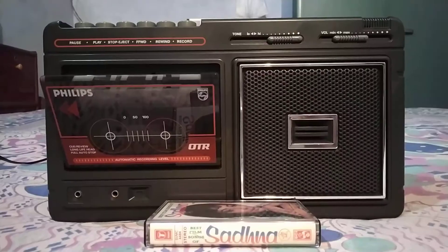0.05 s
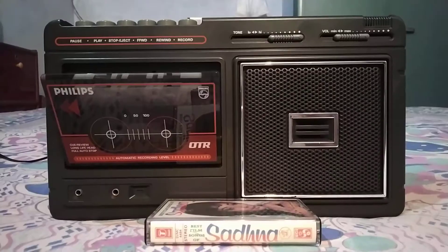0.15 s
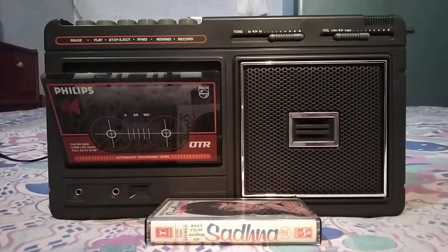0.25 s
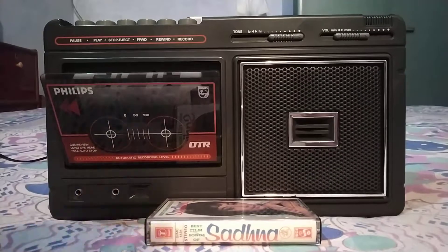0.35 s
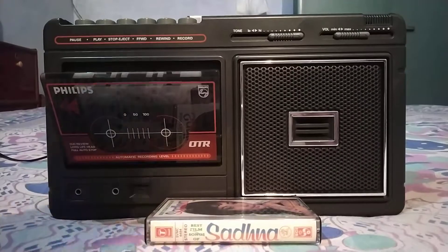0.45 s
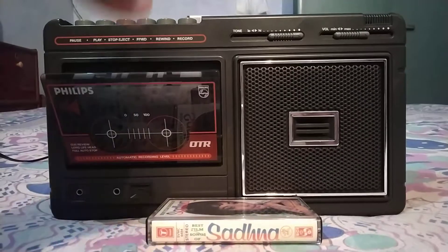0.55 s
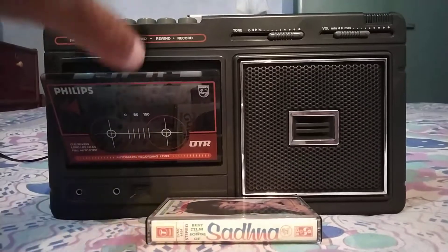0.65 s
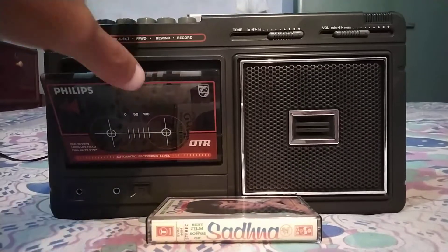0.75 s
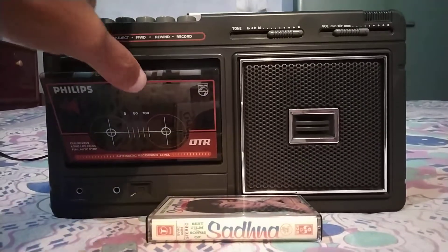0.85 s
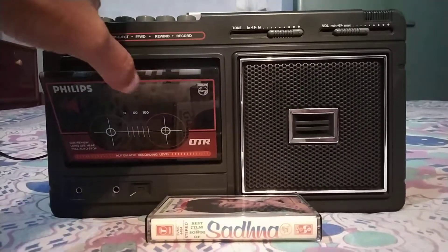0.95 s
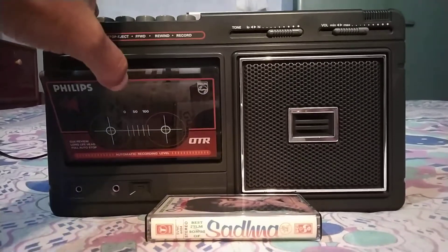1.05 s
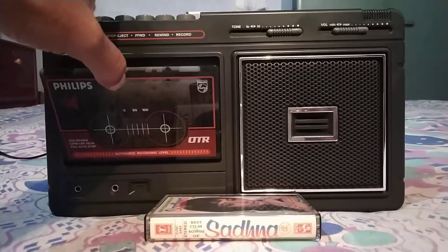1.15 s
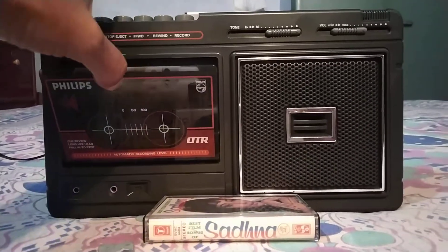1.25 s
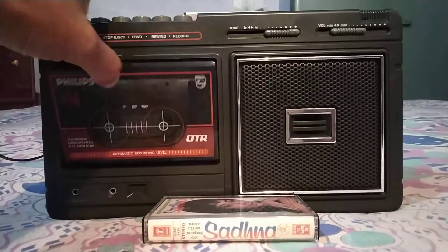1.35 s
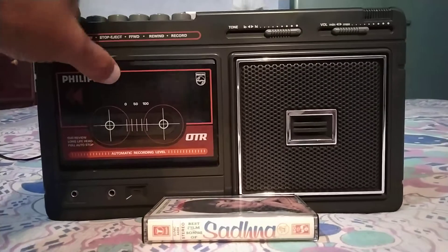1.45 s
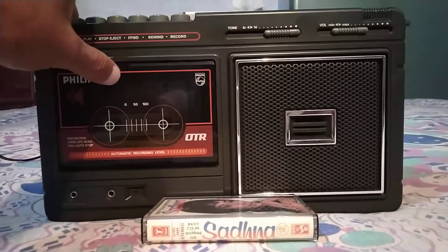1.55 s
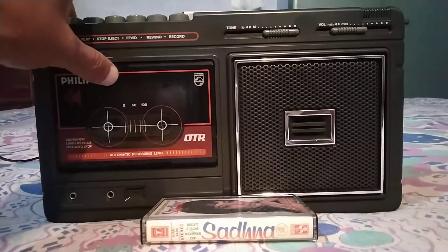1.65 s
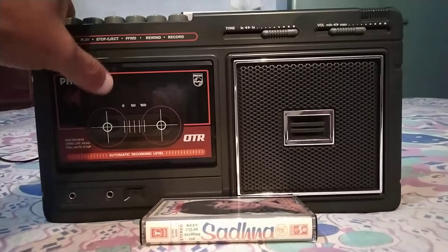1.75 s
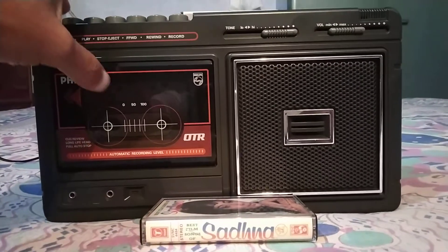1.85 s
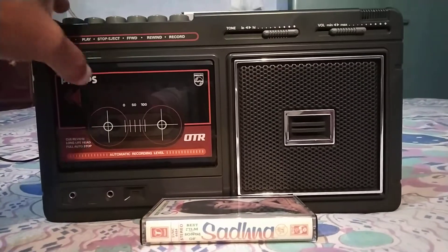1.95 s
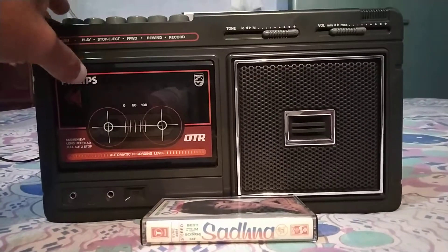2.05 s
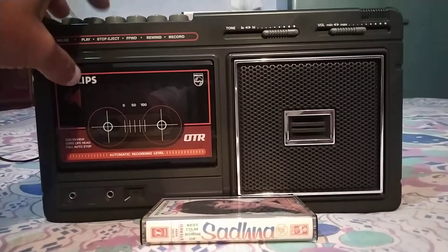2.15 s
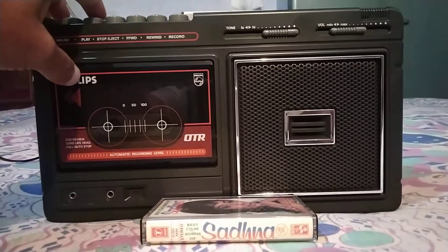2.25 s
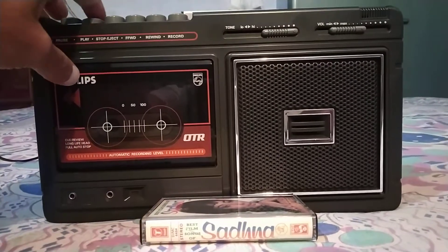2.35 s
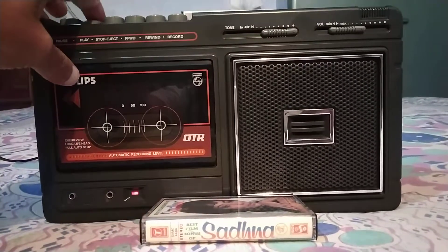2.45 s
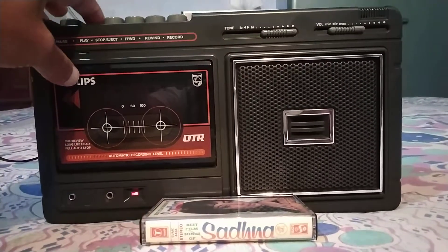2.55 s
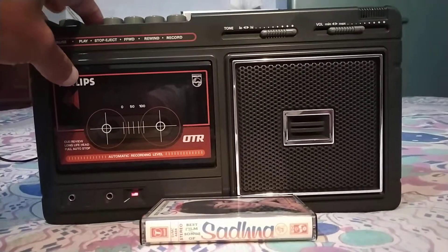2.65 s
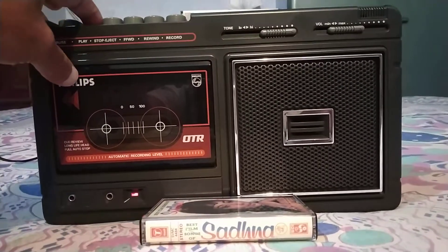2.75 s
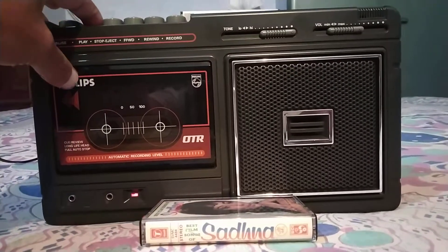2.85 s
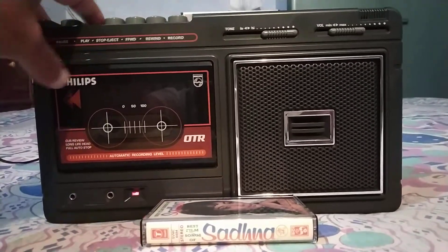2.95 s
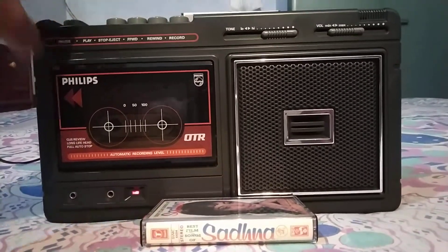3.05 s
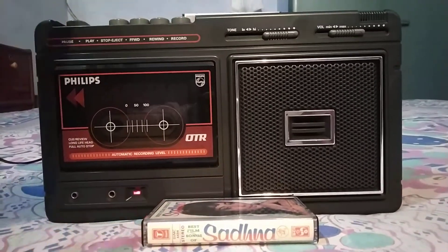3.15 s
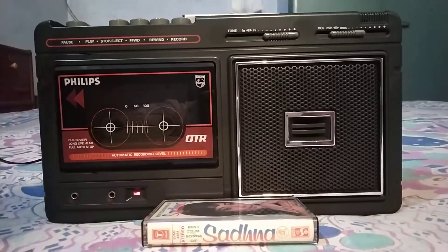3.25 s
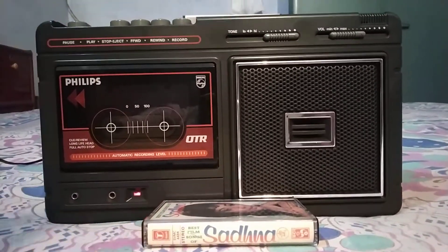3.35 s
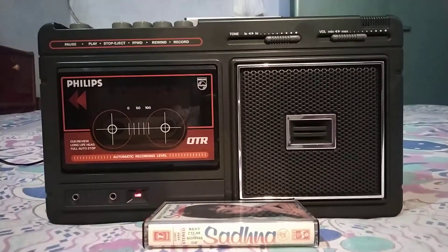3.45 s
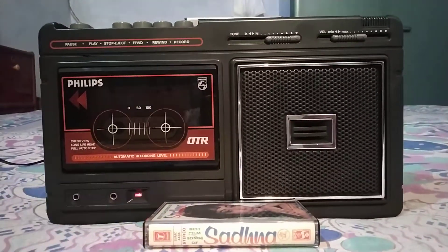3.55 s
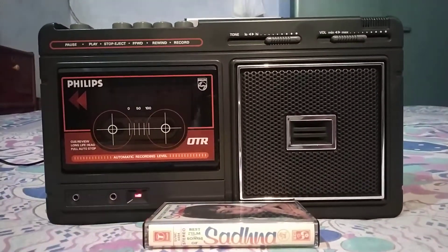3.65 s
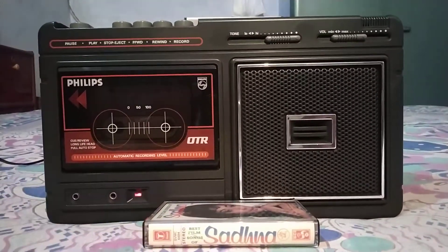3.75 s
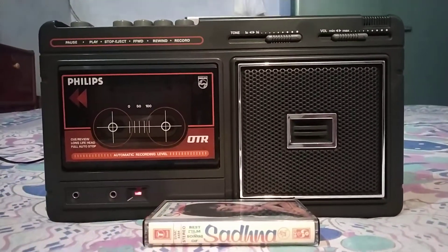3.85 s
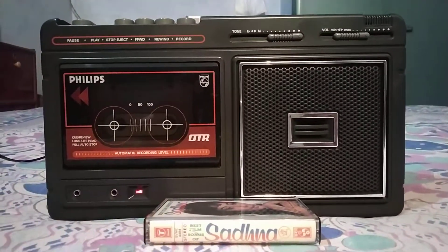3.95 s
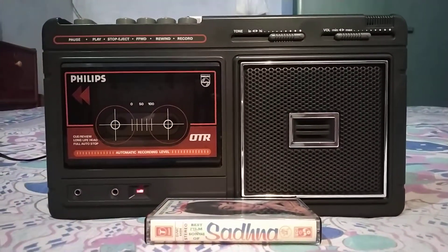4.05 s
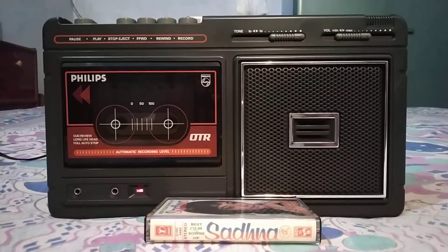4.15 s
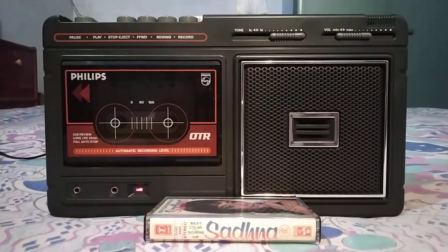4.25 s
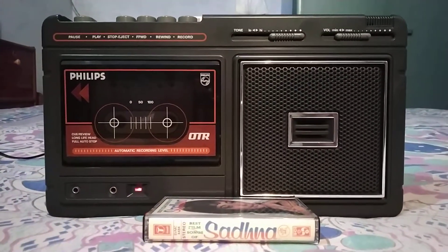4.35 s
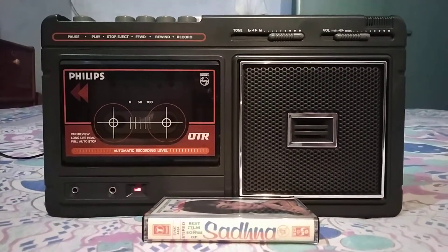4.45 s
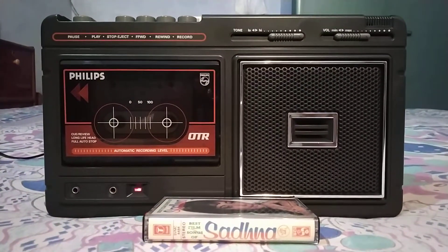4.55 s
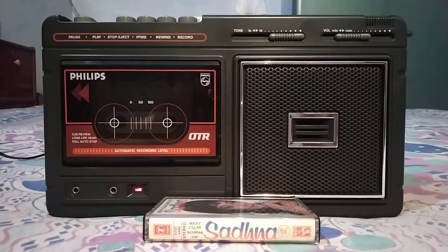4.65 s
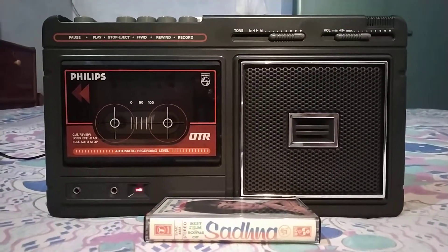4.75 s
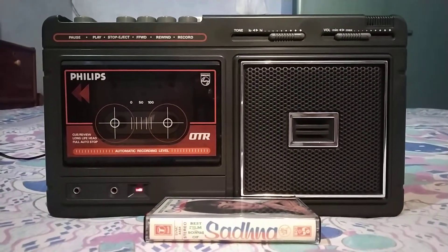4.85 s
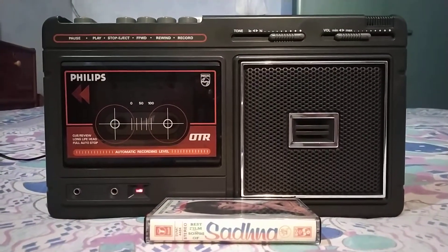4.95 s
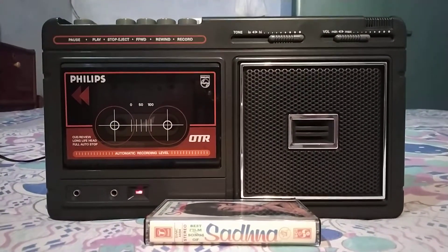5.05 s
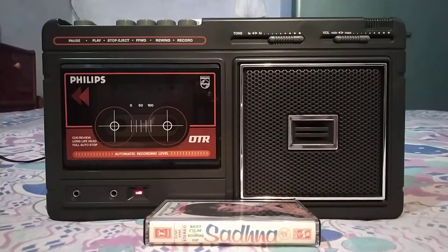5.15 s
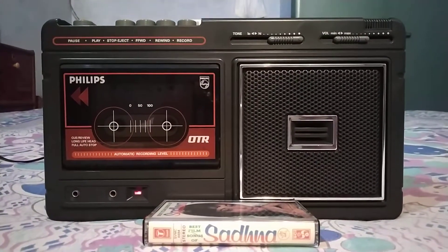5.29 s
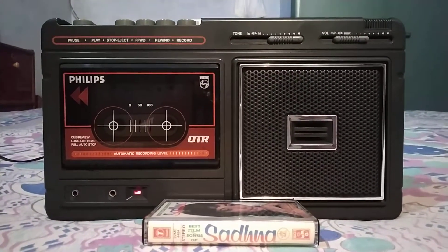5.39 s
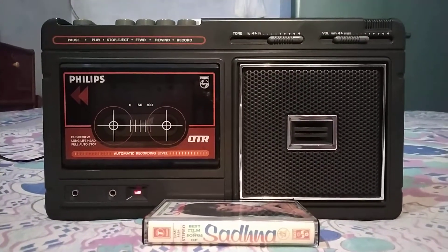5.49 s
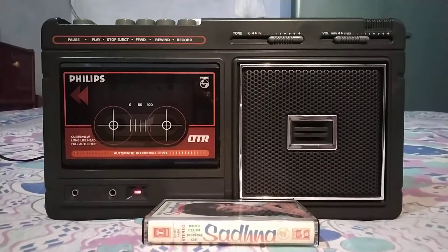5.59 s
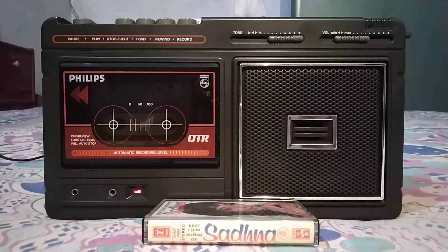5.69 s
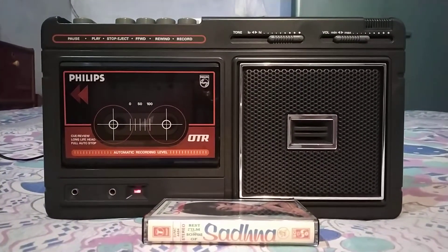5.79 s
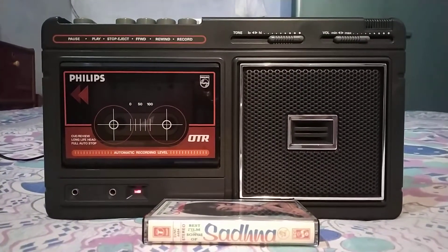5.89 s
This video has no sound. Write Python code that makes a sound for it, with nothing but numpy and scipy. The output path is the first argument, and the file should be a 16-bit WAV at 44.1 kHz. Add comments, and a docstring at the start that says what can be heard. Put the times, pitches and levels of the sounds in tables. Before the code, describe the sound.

Close stereo microphone in a small quiet room with a low fan hum and a very faint clock tick each second. Fingers lightly scrape plastic, a cassette door snaps shut, then a key thumps hollowly and latches with a bright loud snap. A faint motor whirr and hiss remain, with brief fabric rustle and tiny ticks on the right.

```python
"""A fan hums in a quiet room and a clock ticks far off; on a bed, a portable cassette player is handled.
Its door is pushed shut and a key pressed until it latches: noise bursts and decaying modes make the snaps,
low-passed impulses the thumps of the hollow case. Then a pulse train through resonances makes the motor's
whirr and coloured noise the loudspeaker's faint hiss; gated noise and small ticks are a sleeve brushing
the bedsheet, and brief wandering sines are the spool's squeaks."""
import sys
import numpy as np
from scipy import signal
from scipy.fft import rfft, irfft
from scipy.io import wavfile
from scipy.ndimage import uniform_filter1d

SR = 44100
rng = np.random.default_rng(int(sys.argv[2]) if len(sys.argv) > 2 else 0)


def to_wav(sig):
    """Store sig (one row per channel, or 1-D mono) as 16-bit WAV at the path in sys.argv[1].

    Samples outside -1..1 are clipped; the rate is SR.
    """
    pcm = np.clip(np.atleast_2d(sig), -1, 1) * 32767
    pcm = np.round(pcm).astype(np.int16)
    wavfile.write(sys.argv[1], SR, pcm.T)  # frames by channels


N = 261111
T = np.arange(N) / SR  # time of every sample [s]

# the door's catch, then the key's: (time [s], level [dB], tilt [dB/octave], catch resonance [Hz],
# travel to its stop [s], level at the stop [dB], tilt at the stop [dB/octave],
# knock on the case [dB], shaking of the case [dB], left minus right [dB])
LATCH_ROWS = [(1.4364, -15, -1.5, 2500, 0.0067, -17, 1.3, -24.5, -27, 0),
              (2.6718, -6.5, 1.6, 12200, .0032, -13.5, 0.7, -24, -27, -1.5)]


def door_latch():
    """Impact and modal decay: the door's catch snaps home, and its plastic rings dryly and chatters."""
    # what the catch radiates: (frequency [Hz], gain [dB])
    radiated = [(30, -10), (110, -11), (220, 1), (480, 7.5), (880, -6), (1130, 5.5), (1700, 2.5),
                (2100, -4.5), (2500, 2), (3200, -3.5), (4000, -1), (6000, -5), (7400, 3.5), (8500, -5),
                (10000, -5.5), (16000, -16)]
    # the plastic door's dry ring: (frequency [Hz], level [dB], t60 [s], left minus right [dB])
    modes = [(1157, -30.5, 0.057, -2), (1360, -26, 0.028, 3), (1540, -39, 0.046, -3), (1750, -26, 0.032, 0),
             (1960, -39, 0.054, -5), (2410, -26, 0.028, -8), (2860, -34, 0.057, 12), (3570, -31, 0.033, -4),
             (5180, -29, 0.028, -6), (6550, -27.5, 0.023, -6), (7340, -34, .015, 6), (10000, -33, .025, -1)]
    row = LATCH_ROWS[0]
    sound, blows = latch(row, radiated, modes, ring_delay=0.0006)
    chattering = rattle(row[0], modes, level_db=-29.5, per_s=400, t60=0.073, ring_share=0.25)
    return sound + chattering, blows


def key_latch():
    """Impact and modal decay: the key's catch snaps, its shell rings, and jolted springs chatter on."""
    # what the catch radiates: (frequency [Hz], gain [dB])
    radiated = [(30, -33), (110, -10), (220, 2), (480, 7.5), (680, 3), (1250, 1), (1700, 2), (2600, -1),
                (3800, 0), (4900, 2), (6200, -6.5), (8000, -0.5), (11000, -6.5), (16000, -10)]
    # ring of shell, levers and springs: (frequency [Hz], level [dB], t60 [s], left minus right [dB])
    modes = [(219, -39, 0.23, 6), (432, -22, 0.085, 0.5), (503, -23.5, 0.05, 5), (788, -30, 0.1, 2),
             (973, -28.5, 0.041, 9), (1228, -19, 0.044, 6.5), (1780, -20, 0.04, 4), (2420, -25, 0.085, -5),
             (3450, -36, 0.12, 6), (4330, -24, 0.019, -7), (5130, -26, 0.038, -6), (9300, -39, .07, 1),
             (11200, -44, 0.061, 0), (12300, -38, .05, 4)]
    # small springs and levers of the tape drive, jolted by the key:
    # (frequency [Hz], relative level [dB], t60 of the free ring [s], left minus right [dB])
    springs = [(1580, -4, 0.071, 2), (2520, 1, 0.083, -5), (2855, -1, .1, -9), (3030, -5, 0.15, 0),
               (3300, -2, 0.11, -2), (4680, -9, 0.087, 5), (5070, -4, 0.14, -1), (5880, 0, 0.15, -3),
               (6540, -7, .14, 0), (8420, -2, 0.14, 7), (9260, -5, 0.073, 0), (9900, -3, 0.11, 2),
               (11070, -2, .16, 6), (12800, 2, 0.071, -3)]
    row = LATCH_ROWS[1]
    sound, blows = latch(row, radiated, modes, ring_delay=0.0022)
    chattering = rattle(row[0], springs, level_db=-55.5, per_s=790, t60=0.25, ring_share=0.45, delay=0.002)
    return sound + chattering, blows


def latch(row, radiated, modes, ring_delay, bounces=2):
    """Stored spring energy: a catch slips off its edge, strikes its stop and rattles, knocking the case."""
    slip_t60_s, stop_t60_s, stop_hz = 0.022, 0.023, 1280
    knock_hz, knock_delay_s = 900, 0.00147
    rattle_gap_s, rattle_t60_s, rattle_tilt_db = 0.014, 0.034, -4.5
    rattle_db, loss_per_bounce_db, shake_hz = -24, -4, 462
    s, db, tilt, part_hz, travel, stop_db, stop_tilt, knock_db, shake_db, left_db = row
    stop = s + travel
    sharp = [(s, db, slip_t60_s, tilt, part_hz, left_db),
             (stop, stop_db, stop_t60_s, stop_tilt, stop_hz, left_db)]
    dull = [(strike + knock_delay_s, knock_db, knock_hz) for strike in (s, stop)]
    for k in range(bounces):
        bounce, loss_db = stop + (k + 1) * rattle_gap_s, k * loss_per_bounce_db
        bounce_db = db + rattle_db + loss_db
        sharp.append((bounce, bounce_db, rattle_t60_s, rattle_tilt_db, stop_hz, left_db))
        dull.append((bounce, shake_db + loss_db, shake_hz))
    return snaps(sharp, radiated) + ringing(s + ring_delay, modes), dull


def snaps(contacts, radiated, size=8192):
    """Source and filter: each snap is a dying burst of tiny contacts, coloured by what radiates it."""
    rise_s, shared, lag_s = 0.0008, 0.15, 0.00019
    pivot_hz, bump_db, bump_octaves = 3500, 5, 0.4
    out, hz = np.zeros((2, N)), bins(size)
    for s, db, t60, tilt, part_hz, left_db in contacts:
        slope = tilt * np.log2(np.maximum(hz, 500) / pivot_hz)
        bump = bump_db * np.exp(-(np.log2((hz + 1) / part_hz) / bump_octaves) ** 2)
        colour = causal(read(radiated, hz) + slope + bump)
        colour_rms = np.sqrt(np.mean(abs(colour) ** 2))
        snap = irfft(chatter(t60, rise_s, shared, size) * colour / colour_rms)
        add(out, s, amp(db) * pan(left_db) * snap)
    return ports(out, lag_s)


def chatter(t60, rise, shared, size):
    """Many tiny contacts: spectrum of a dying stereo burst with about equal energy in every band."""
    t, contacts = T[:size], noise([(0, 0)], size=size)
    envelope = amp(-60 * t / t60) * (1 - np.exp(-t / rise))
    burst = rfft(evened(contacts + shared * contacts[::-1]) * envelope)
    power = uniform_filter1d((abs(burst) ** 2).mean(0), size=100)
    return burst * causal(-10 * np.log10(power / power.mean() + 1e-6))


def ringing(s, modes, rise=0.00029, lag=0.00021):
    """Modal superposition: a struck part rings as a sum of decaying sines."""
    out, t = np.zeros((2, N)), T[:SR // 2]
    for (hz, db, t60, left_db), phase in zip(modes, rng.random(len(modes))):
        envelope = amp(db - 60 * t / t60) * (1 - np.exp(-t / rise))
        add(out, s, pan(left_db) * envelope * np.sin(2 * np.pi * (hz * t + phase)))
    return ports(out, lag)


def rattle(s, modes, level_db, per_s, t60, ring_share, delay=0.008):
    """Random excitation: ever weaker contacts ring the modes of jolted parts; touching cuts the ring short."""
    out, t = np.zeros((2, N)), T[:SR // 3]
    for hz, db, ring_t60, left_db in modes:
        chance, strength = rng.random(len(t)), rng.standard_normal((2, len(t)))
        contacts = evened(strength * (chance < per_s / SR)) * amp(-60 * t / t60)
        ring = amp(-60 * t / (ring_t60 * ring_share)) * np.sin(2 * np.pi * hz * t)
        add(out, s + delay, amp(level_db + db) * pan(left_db) * evened(convolve(contacts, ring)))
    return out


def thumps(blows, left_db=1.5, size=8192):
    """Contact stiffness: each push into the hollow case is an impulse; softer contact has less treble."""
    # what a thump radiates: (frequency [Hz], gain [dB])
    radiated = [(30, -76), (100, -83), (150, -21.5), (195, -4.5), (222, 7), (270, 0.5), (350, -1),
                (450, 6.5), (560, 3.5), (720, -9), (1100, -11.5), (1700, -22), (5000, -11), (16000, -19)]
    out, hz = np.zeros(N), bins(size)
    for s, db, corner_hz in blows:
        blow = irfft(causal(read(radiated, hz)) / (1 + 1j * hz / corner_hz) ** 2)
        add(out, s, -amp(db) * blow / abs(blow).max())
    return out * pan(left_db)


def judders(left_db=2.0):
    """Single resonance: as the finger eases off, one low tone of the case swells and fades."""
    # shudders of the case: (time [s], peak level [dB], frequency [Hz], half length to 1/e [s])
    shudders = [(1.667, -37, 424, 0.0093), (2.959, -34, 246, 0.011)]
    out = np.zeros(N)
    for s, db, hz, width in shudders:
        out += amp(db) * np.exp(-((T - s) / width) ** 2) * np.sin(2 * np.pi * hz * (T - s))
    return pan(left_db) * out


def scrapes_and_nudges(count=5, uneven=0.0596):
    """Stick-slip friction: each rub slips unevenly; every slip is a scrape and a soft blow."""
    # soft scrapes and nudges on the plastic, and at 1.27 s a faint, soft sound that blends into a clock tick:
    # (time of the strongest slip [s], scrape [dB], nudge [dB], softness corner [Hz], length [s])
    rubs = [(1.053, -47, -67, 1190, 0.0077), (1.077, -48.5, -42.5, 1040, 0.0067),
            (1.27, -50, -44, 900, .03), (1.662, -40, -35, 1200, 0.048), (2.323, -44, -39, 900, 0.0156),
            (2.955, -51, -36, 280, 0.032)]
    edge_db = -6.5  # slips weaken before and after the strongest one
    scrape_t60_s, scrape_tilt_db, scrape_hz = 0.067, -4, 1000  # tilt per octave
    chances = rng.standard_normal((len(rubs), count))
    sharp, dull = [], []
    for (s, scrape_db, nudge_db, corner_hz, length), chance in zip(rubs, chances):
        for phase in np.linspace(-1, 1, count) + uneven * chance:
            slip, loss_db = s + phase * length / 2, edge_db * abs(phase)
            sharp.append((slip, scrape_db + loss_db, scrape_t60_s, scrape_tilt_db, scrape_hz, 0))
            dull.append((slip, nudge_db + loss_db, corner_hz))
    return sharp, dull


def small_contacts(scrapes):
    """Impact radiation: scrapes, clicks of loose plastic and small sleeve ticks share one colour."""
    # light clicks of loose plastic and, from 3.6 s, small ticks of the sleeve, on the right:
    # (time [s], level [dB], t60 [s], tilt [dB/octave], left minus right [dB])
    clicks_and_ticks = [(1.0769, -36, 0.022, -8, -3), (1.1202, -31, 0.012, 8.5, 0),
                        (1.35, -34.5, 0.056, -.5, 0), (1.376, -41, 0.058, 1, -3),
                        (1.3939, -37.5, 0.14, -3, -1.5), (1.413, -44, 0.12, 6.5, -1),
                        (1.457, -32, 0.058, 0, -4), (1.467, -17.5, 0.012, 4, 0),
                        (2.377, -20, 0.0092, -4, -3), (2.389, -28, 0.04, -5, 4),
                        (2.435, -44, 0.11, 2.5, -1), (2.5029, -26, 0.029, -0.5, -2),
                        (2.5331, -22, 0.029, -5.5, 3), (2.6601, -26, 0.019, -0.5, -2.5),
                        (2.8725, -29, 0.0089, -3.5, 0), (3.2434, -34, .008, 14, 0),
                        (3.6435, -24, 0.0044, 6, -11), (3.661, -35, .01, 4, -10),
                        (3.7885, -27, .008, 10, -14), (3.953, -37.5, 0.023, -2.5, -10)]
    # what a snap radiates: (frequency [Hz], gain [dB])
    radiated = [(30, -15), (110, -13), (220, 2.5), (480, 9), (850, 1.5), (1250, 3), (1700, 0), (2600, 1),
                (3500, -0.5), (5000, -4), (7000, -2.5), (11000, -4.5), (16000, -16)]
    part_hz = 3780  # centre of their broad resonance
    light = [(s, db, t60, tilt, part_hz, left_db) for s, db, t60, tilt, left_db in clicks_and_ticks]
    return snaps(scrapes + light, radiated)


def motor(lag=0.00023, left_db=1.5, low_hz=180, high_hz=1600, spread=0.012):
    """Periodic forcing: one knock a turn, coloured by the shell's resonances and blurred to a whirr."""
    # rotation: (time [s], speed [turns/s])
    speed = [(3.0, 39.35), (3.7, 39.65), (4.6, 39.65), (5.9, 39.8)]
    # loudness: (time [s], level [dB])
    level = [(2.38, -76), (2.46, -57), (2.8, -55), (3.1, -54.5), (5.9, -55)]
    # resonances that the drive shakes: (frequency [Hz], width [Hz], gain [dB])
    resonances = [(304, 56, 0.5), (425, 46, -4), (535.5, 31.3, 5), (643, 26, -2.5), (773, 46, -2),
                  (1006, 20, 3), (1142, 37, 1.5), (1234.4, 24, 3.5)]
    rough, uneven = 0.15, 0.08
    turns, hz = np.cumsum(curve(speed)) / SR, bins(N)
    knocks = np.diff(np.floor(turns), prepend=0) * (1 + uneven * rng.standard_normal(N))
    push = rfft(evened(knocks) + rough * rng.standard_normal(N))
    body = sum(amp(db) / (1 + 1j * (hz ** 2 - f ** 2) / (width * hz + 1e-9)) for f, width, db in resonances)
    band = hz ** 4 / (hz ** 4 + low_hz ** 4) / (1 + (hz / high_hz) ** 4)  # a small case radiates no bass
    bending = np.exp(-4j * np.pi * spread * np.sqrt(hz * high_hz))  # low notes cross the shell more slowly
    drive = evened(irfft(push * body * band * bending, N))
    return ports(drive * amp(curve(level)) * pan(left_db), lag)


def spool(pitch_hz=5805, wander=0.002):
    """Frequency modulation: thin, separate chirps of wandering pitch as the tape winds."""
    # faint squeaks of the turning spool: (start [s], length [s], peak level [dB])
    squeaks = [(4.543, 0.06, -65), (4.616, 0.042, -60), (4.695, 0.098, -63)]
    cycles = np.cumsum(pitch_hz * (1 + wander * drift(57))) / SR
    swell = sum(amp(db) * np.sin(np.pi * ramp(s, length)) for s, length, db in squeaks)
    return swell * np.sin(2 * np.pi * cycles)


def speaker(shared=0.13):
    """Broadband noise through cone resonances: amplifier and tape hiss, with some channel crossfeed."""
    # hiss coloured by the loudspeaker cone: (frequency [Hz], relative density [dB per Hz])
    hiss_colour = [(60, -40), (150, -43), (480, 10.5), (700, 5.5), (1300, 3), (2100, -0.5), (2600, -2),
                   (3300, -1), (4200, 0), (5700, -3.5), (6450, -3.5), (6800, -6.5), (7500, -1.5),
                   (8100, -7.5), (9500, -7), (16000, -21)]
    hiss = noise(hiss_colour)
    return evened(hiss + shared * hiss[::-1]) * hiss_level()


def hiss_level():
    """Gain control: amplifier switch-on, settling surge, then the step from leader to coated tape."""
    on_s, rise_s, level_db = 2.42, 0.11, -60
    surge_db, settle_s = 9, 0.44
    coating_s, coating_db = 5.13, 5.5
    surge = surge_db * np.exp(-((T - on_s) / settle_s) ** 2)
    return ramp(on_s, rise_s) * amp(level_db + surge + coating_db * ramp(coating_s, rise_s))


def sleeve(left_db=-9, snags_per_s=260, snag_db=-5, snag_spread_db=2.0):
    """Stick-slip of threads: uneven clumps of fine crackle, on the right; a few snag and snap free."""
    # sleeve on the sheet: (frequency [Hz], relative density [dB per Hz])
    rustle = [(300, 7), (1500, 1.5), (4000, -2), (7500, 3.5), (12000, 2.5), (16000, -2.5)]
    release_s = 0.00095  # a snagged thread lets go this quickly
    grain_db = 2.5 * drift(1500) + 1.5 * drift(300) + drift(40)
    hz = bins(N)
    snag_sizes = amp(snag_spread_db * np.minimum(rng.exponential(1, N), 3))
    snags = snag_sizes * (rng.random(N) < snags_per_s / SR)
    snags = signal.lfilter([1], [1, -np.exp(-1 / (release_s * SR))], snags)
    grain = noise([(0, 0)]) * evened(amp(grain_db))
    threads = rfft(grain + amp(snag_db) * noise([(0, 0)]) * evened(snags))
    high_pass = hz / (hz + rustle[0][0])
    return evened(irfft(threads * amp(read(rustle, hz)) * high_pass, N)) * rustle_level() * pan(left_db)


def rustle_level():
    """Addition of power: each stroke swells, holds and dies away over a faint lingering drag."""
    # strokes of the sleeve: (time of full level [s], level [dB], hold [s])
    strokes = [(3.629, -47, 0.012), (3.742, -49.5, 0.01), (3.797, -45, 0.012), (3.91, -53.5, 0.061)]
    rise_s, t60_s, drag_db, drag_t60_s = 0.046, 0.48, -14.5, 6.1
    power = np.zeros(N)
    for s, db, hold in strokes:
        after = np.maximum(T - s - hold, 0)
        release = np.maximum(amp(-60 * after / t60_s), amp(drag_db - 60 * after / drag_t60_s))
        power += (amp(db) * ramp(s - rise_s, rise_s) * release) ** 2
    return np.sqrt(power)


def fan(waver=0.23, wander=0.054, air_db=-53, swell_db=1):
    """Tones plus turbulence: a hum wavering in strength and phase [rad] over softly swelling air noise."""
    # steady lines: (frequency [Hz], level [dB rms])
    lines = [(134.6, -68), (199.4, -49)]
    # air noise under them: (frequency [Hz], relative density [dB per Hz])
    air = [(25, -58), (60, -37), (100, -25.5), (135, -11), (165, -7.5), (240, 0), (330, -5.5), (480, -6),
           (650, -19.5), (1000, -21.5), (3000, -26), (7000, -26.5), (13000, -22.5), (16000, -23.5)]
    hum = np.zeros(N)
    for f, db in lines:
        strength = amp(db) * np.sqrt(2) * (1 + waver * drift(18.5))
        hum += strength * np.sin(2 * np.pi * f * T + wander * drift(8.5))
    return hum + amp(air_db + swell_db * drift(0.75) / 2) * noise(air) + eddies()


def eddies(depth_db=4.5, rate_hz=4):
    """Turbulent modulation: the fan's draught swells and sinks, each low band in its own time."""
    # swelling bands: (centre frequency [Hz], level before the swelling [dB])
    centres = [(265, -63.5), (450, -65.5)]
    out = np.zeros((2, N))
    for hz, db in centres:
        band = noise([(hz / 2, -45), (hz, 0), (hz * 2, -45)]) * amp(db)
        out += band * amp(depth_db * np.tanh(drift(rate_hz) / 2) * 2)
    return out


def clock(first_s=0.264, level_db=-52, rise=0.0053, t60=0.5):
    """Diffuse field: a tick each second, so far away that only its reverberation arrives."""
    # colour of the tick: (frequency [Hz], relative density [dB per Hz])
    tick = [(500, -23), (1000, -17), (1300, -0.5), (1650, -4), (2250, 4.5), (2700, -7.5), (4000, -3),
            (7000, -12), (15000, -25)]
    out, t = np.zeros((2, N)), T[:SR // 2]
    envelope = amp(level_db - 60 * t / t60) * (1 - np.exp(-t / rise))
    for second in range(int(T[-1]) + 1):
        add(out, first_s + second, noise(tick, size=len(t)) * envelope)
    return out


def thump_echoes(x, wall_s=0.0225, wall_db=-17, wall_hz=420, room_db=-3.0, room_hz=650):
    """Absorption: the bed soaks up the treble of each thump; a dull slap off the near wall, and the room."""
    hz, spectrum = bins(N), rfft(x)
    slap = irfft(spectrum * np.exp(-2j * np.pi * hz * wall_s) / (1 + 1j * hz / wall_hz) ** 2, N)
    return amp(wall_db) * slap + amp(room_db) * room(irfft(spectrum / (1 + 1j * hz / room_hz), N))


def room(x, wet_db=-1, gap=0.0113, build=0.00089):
    """Reverberation: wall echoes arrive in clumps and form a tail; each band dies at its own speed."""
    # decay time: (frequency [Hz], t60 [s])
    decay = [(200, 0.25), (500, 0.36), (1200, 0.34), (4000, 0.38), (9000, 0.34), (16000, 0.27)]
    # colour of the tail: (frequency [Hz], gain [dB])
    tail_colour = [(100, -9), (220, -5), (450, -6), (640, -9.5), (900, -7), (2000, -11), (6000, -12.5),
                   (11000, -10), (16000, -10)]
    hz, t, z = signal.stft(noise([(0, 0)], size=SR), SR, nperseg=256)
    fading = z * amp(-60 * t / read(decay, hz)[:, None])
    tail = signal.istft(fading, SR, nperseg=256)[1][:, :SR]
    clumps_db = 1.5 * drift(350)[:SR]
    tail *= np.clip((T[:SR] - gap) / build, 0, 1) * amp(clumps_db)
    tail = irfft(rfft(evened(tail)) * causal(read(tail_colour, bins(SR)))) / np.sqrt(SR)
    return amp(wet_db) * convolve(x, tail)


def ports(x, lag):
    """Interaural delay: the mechanism's sound reaches the right microphone first, the left lag s later."""
    size = x.shape[-1]
    left, right = rfft(x)
    return irfft(np.array([left * np.exp(-2j * np.pi * bins(size) * lag), right]), size)


def noise(points, size=N):
    """Diffuse-field coherence: coloured stereo noise of rms 1, alike in the bass, unrelated in the treble."""
    # left-right likeness: (frequency [Hz], correlation [-1 to 1])
    likeness = [(30, 0.3), (130, 0.72), (300, 0.92), (640, 0.52), (1400, 0.029), (16000, 0.015)]
    hz = bins(size)
    left, other = rfft(rng.standard_normal((2, size)))
    same = np.clip(read(likeness, hz), -1, 1)
    right = same * left + np.sqrt(1 - same ** 2) * other
    return evened(irfft(np.array([left, right]) * amp(read(points, hz)), size))


def drift(rate_hz):
    """Band-limited chance: low-passed noise of rms 1."""
    return evened(irfft(rfft(rng.standard_normal(N)) * np.exp(-(bins(N) / rate_hz) ** 2), N))


def causal(db):
    """Minimum phase: spectrum of the quickest-dying response that has these band gains."""
    log_gain = np.log(amp(np.r_[db, db[-2:0:-1]]))
    return np.exp(np.conj(signal.hilbert(log_gain)))[:len(db)]


def convolve(x, response):
    """Linear superposition: passes x through a response, channel by channel."""
    return signal.fftconvolve(np.atleast_2d(x), np.atleast_2d(response), axes=1)[:, :N]


def pan(db):
    """Level difference: gains of the two channels for left minus right in dB."""
    return amp(np.array([[db], [-db]]) / 2)


def amp(db):
    """Logarithmic level: decibels to gain."""
    return 10 ** (np.asarray(db) / 20)


def evened(x):
    """Mean-square level: scales to rms 1."""
    return x / np.sqrt(np.mean(x ** 2) + 1e-20)


def read(points, hz):
    """Logarithmic pitch scale: reads a spectrum on a log-frequency axis."""
    f, value = np.transpose(points)
    return np.interp(np.log(hz + 1), np.log(f + 1), value)


def curve(rows):
    """Linear interpolation: reads a control curve at every sample."""
    return np.interp(T, *np.transpose(rows))


def ramp(start, length):
    """Linear onset: rises from 0 to 1, beginning at time start."""
    return np.clip((T - start) / length, 0, 1)


def bins(size):
    """Fourier analysis: frequencies of a spectrum of that many samples."""
    return np.fft.rfftfreq(size, 1 / SR)


def add(mix, s, sound):
    """Superposition: mixes a sound in at time s."""
    part = mix[..., round(s * SR):][..., :sound.shape[-1]]
    part += sound[..., :part.shape[-1]]


def scene():
    """Direct and reverberant sound: the player close by, its echoes and the quiet room behind it."""
    # dull blows on the case and its loudspeaker cone: (time [s], peak level [dB], softness corner [Hz])
    case_blows = [(1.417, -28.5, 300), (1.4499, -23, 450), (1.492, -29, 600), (1.6545, -36, 1000),
                  (1.6645, -28.5, 900), (1.674, -37, 800), (1.697, -44, 700), (2.3198, -40, 1190),
                  (2.3878, -6, 594), (2.447, -29, 600), (2.496, -30.5, 600), (2.5334, -21.5, 910),
                  (2.5357, -7.5, 1110), (2.5364, -8.5, 293), (2.586, -49, 1400), (2.8725, -32.5, 900)]
    # how much reaches the room: the door faces forward, the keys face the ceiling
    door_echo_db, key_echo_db = -1.5, 0.5
    door, door_blows = door_latch()
    key, key_blows = key_latch()
    scrapes, nudges = scrapes_and_nudges()
    small = small_contacts(scrapes)
    knocks = thumps(door_blows + key_blows + nudges + case_blows) + judders()
    echoes = room(amp(door_echo_db) * (door + small) + amp(key_echo_db) * key) + thump_echoes(knocks)
    close = door + key + small + knocks + echoes + motor() + spool() + speaker()
    return close + sleeve() + fan() + clock()


def record(dry):
    """Band limitation: the recorder's linear-phase low-pass filter."""
    edge_hz = 16000
    low_pass = signal.firwin(511, edge_hz, window=("kaiser", 9), fs=SR)
    return signal.oaconvolve(dry, low_pass[None], "same")


dry = scene()
out = record(dry)
to_wav(out)
```